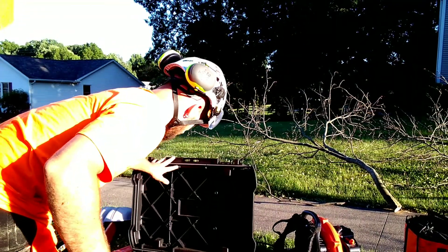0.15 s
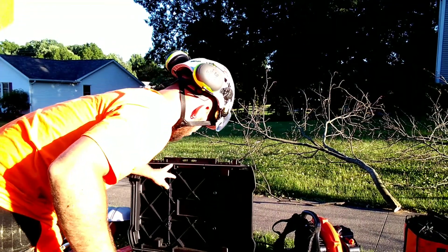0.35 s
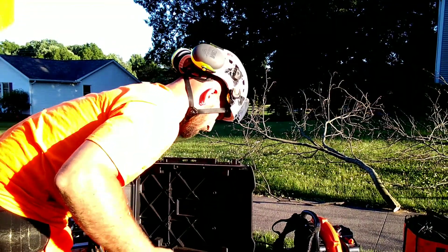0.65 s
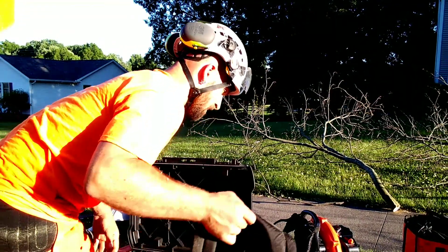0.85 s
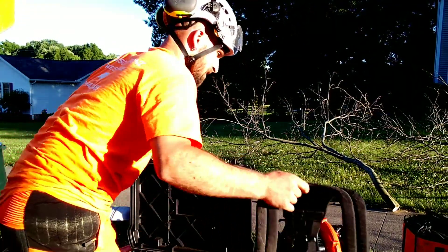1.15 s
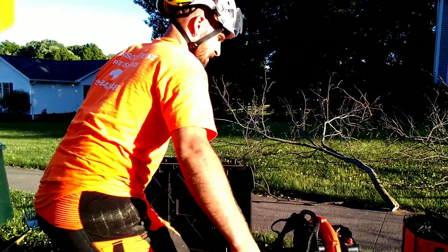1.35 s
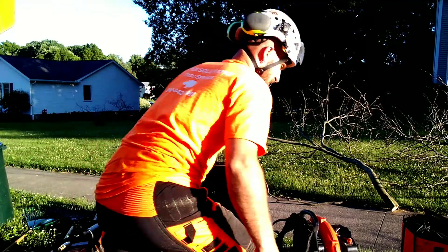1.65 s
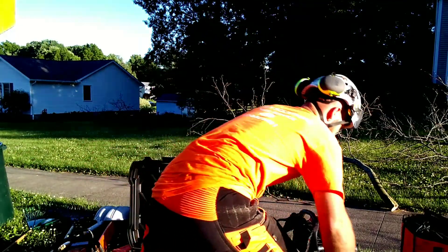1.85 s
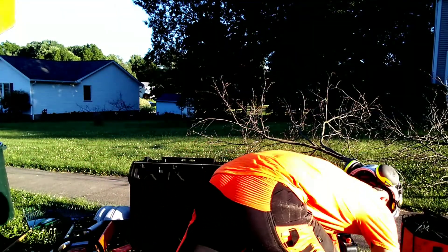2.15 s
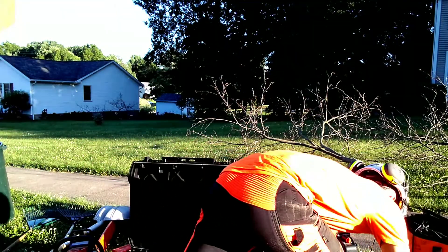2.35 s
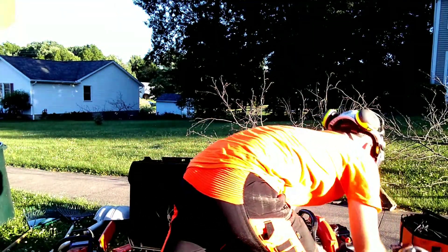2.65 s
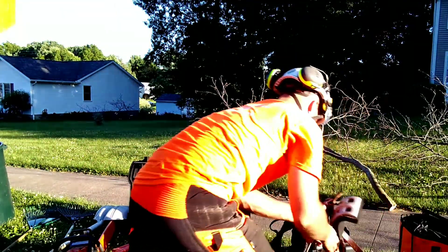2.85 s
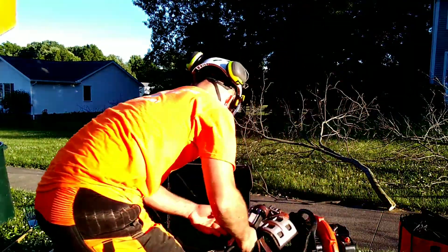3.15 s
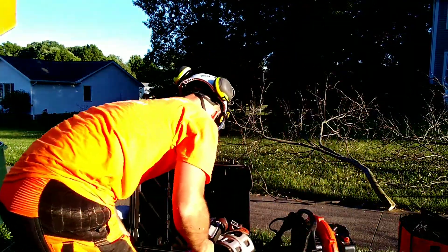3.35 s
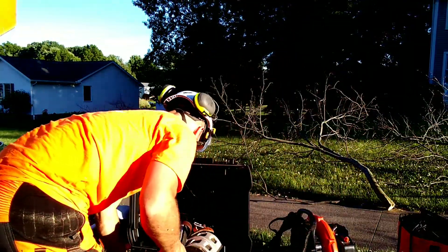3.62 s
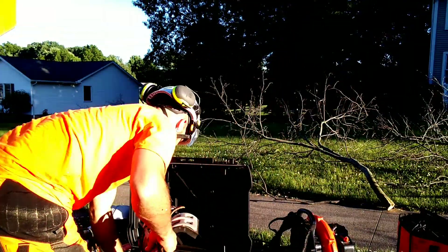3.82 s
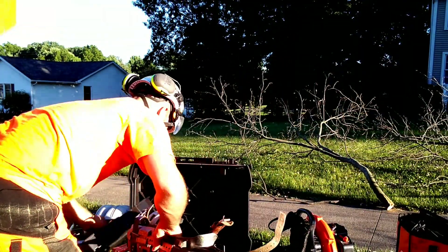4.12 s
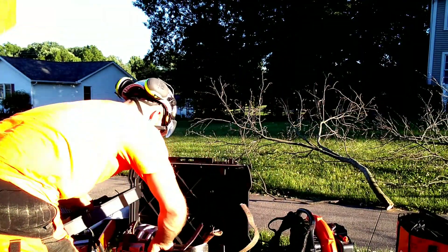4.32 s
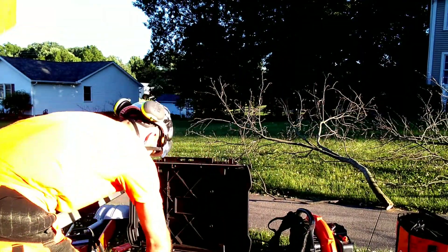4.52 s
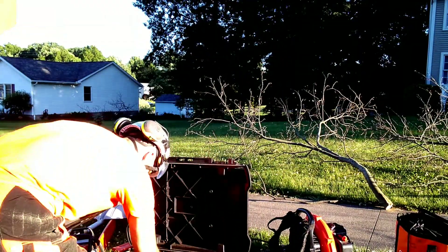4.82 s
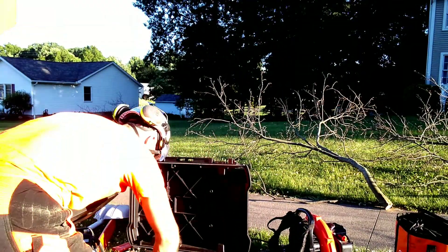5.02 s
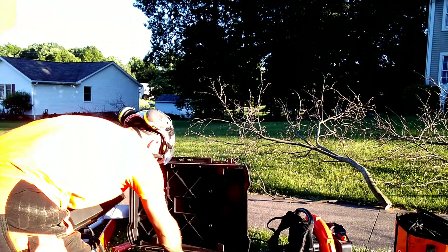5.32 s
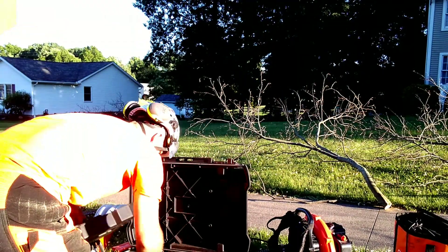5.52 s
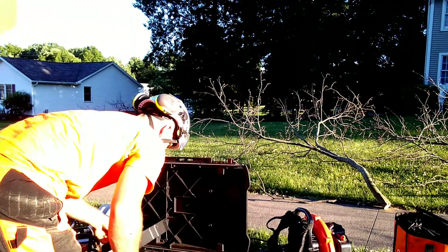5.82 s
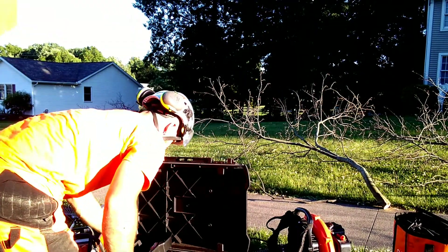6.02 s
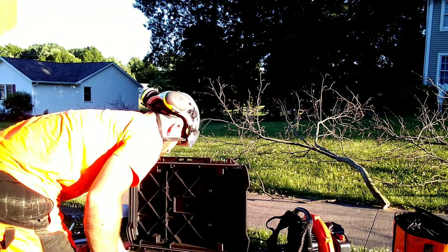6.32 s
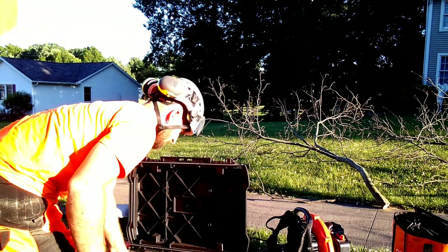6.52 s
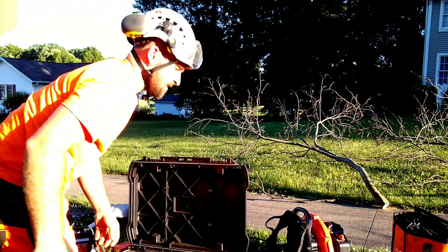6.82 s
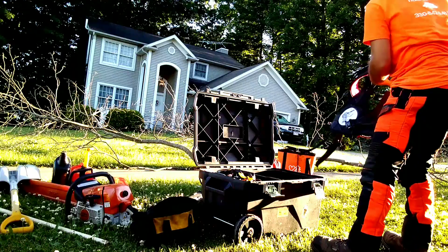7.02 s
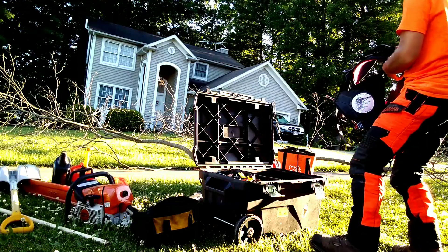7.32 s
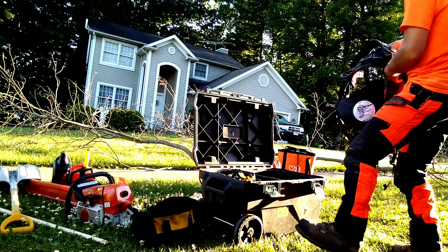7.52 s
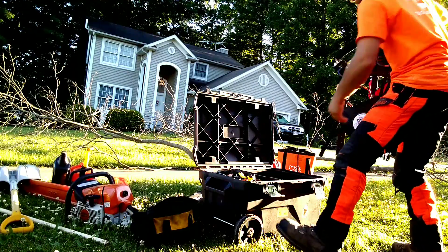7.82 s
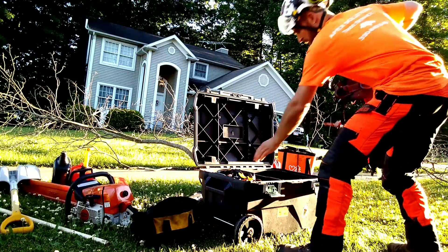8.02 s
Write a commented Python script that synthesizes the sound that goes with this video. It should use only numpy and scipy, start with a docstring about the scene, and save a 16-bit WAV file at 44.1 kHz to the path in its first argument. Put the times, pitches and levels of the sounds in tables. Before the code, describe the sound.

Climbing hardware is packed into a plastic toolbox outdoors, near the microphone. First comes a burst of clinking buckles and swishing straps, then sharp clacks as the gear is shifted. Three loads land in the box, making its walls boom while the pieces rattle and scrape. It ends with quiet rustling and low, soft steps, over a faint background of traffic, a far motor and birds.

```python
"""Climbing hardware goes into a plastic toolbox on a lawn, near a two-port camera microphone.
First webbing rustles and the gear is lifted: parts clack and metal pieces ring on their own modes.
It is jostled from 2.3 s, then dropped in near 4.7, 5.4 and 6.3 s, and the box walls boom.
From 7 s the gear is further off and footfalls shake the camera stand.
Throughout, traffic, a far motor, leaves and birds fill the pauses."""
import sys
import numpy as np
from scipy import signal
from scipy.fft import rfft, irfft
from scipy.io import wavfile
from scipy.ndimage import uniform_filter1d, map_coordinates

SR = 44100
rng = np.random.default_rng(int(sys.argv[2]) if len(sys.argv) > 2 else 0)


def materialize(psi):
    """Save the field psi as 16-bit PCM at rate SR to the path in sys.argv[1].

    A 1-D psi becomes a single channel; in a 2-D psi each row is a channel.
    """
    bounded = np.clip(np.atleast_2d(psi).T, -1, 1)
    quanta = np.round(bounded * 32767).astype(np.int16)
    wavfile.write(sys.argv[1], SR, quanta)


N = 359856

# hard contacts: t/s, tick level/dB, knock level/dB, knock f/Hz, slope below f/(dB/octave), tick t60/s
CONTACTS = [(0.134, -69, -42.5, 447, 2, 0.03), (0.176, -39, -41.5, 600, -2, 0.023),
            (0.2018, -43, -40, 440, 7, 0.065), (0.8487, -61, -50.5, 554, 13, 0.05),
            (0.9032, -67, -43, 560, -24, 0.013), (1.1209, -44, -49.5, 525, -7, 0.19),
            (1.1474, -38.5, -40.5, 2140, 28, 0.088), (1.4136, -18, -33.5, 575, 0, 0.023),
            (1.4526, -18, -22.5, 625, 8, 0.059), (1.4782, -11.5, -33, 397, 0, 0.06),
            (1.521, -27, -41.5, 401, 5, 0.18), (1.5544, -29, -35, 432, 3, 0.087),
            (1.5721, -20.5, -31, 384, 2, 0.044), (1.5898, -32, -66, 546, 4, 0.045),
            (1.6352, -26.5, -36, 875, 1, 0.022), (1.66, -29, -42, 401, 10, 0.015),
            (1.6806, -53, -34, 406, 5, 0.022), (1.8723, -47, -69, 2440, 9, 0.072),
            (2.283, -43.5, -71, 412, 2, 0.05), (2.3314, -55, -34, 830, 5, 0.034),
            (2.3808, -40, -38, 867, 2, 0.062), (2.4014, -16, -20, 1590, 9, 0.029),
            (2.4189, -26.5, -36.5, 1350, -0.5, 0.088), (2.4441, -16, -24, 1520, 7, 0.043),
            (2.4853, -27.5, -22, 2640, 3.5, 0.032), (2.5447, -35.5, -43, 1320, 0.5, 0.071),
            (2.6736, -35, -40, 1396, 6, 0.029), (2.7464, -44, -38.5, 2480, 6, 0.038),
            (2.7559, -60, -32.5, 2510, 3, 0.03), (2.7844, -45, -36.5, 2600, 8, 0.028),
            (2.9106, -43, -44.5, 1150, 14, 0.12), (2.9718, -2.5, -18.5, 2254, 1.5, 0.077),
            (3.1329, -5.5, -15.5, 2104, 3, 0.069), (3.175, -25.5, -30.5, 786, 12, 0.075),
            (3.217, -23, -44, 1200, 4, 0.036), (3.2257, -37, -26, 1223, 2, 0.045),
            (3.258, -10.5, -23.5, 1368, 2, 0.055), (3.3896, -61, -18, 1216, -5.5, 0.06),
            (3.4934, -47, -45, 544, 7, 0.041), (3.587, -50, -45, 450, 11, 0.06),
            (3.6242, -66, -38, 405, 13, 0.055), (3.6375, -45.5, -37, 394, -2, 0.12),
            (3.9011, -46, -34.5, 1040, -2.5, 0.11), (3.9578, -40.5, -41.5, 2690, 1, 0.078),
            (3.9937, -56, -41, 447, -4, 0.099), (4.112, -54, -45, 1020, 10.5, 0.06),
            (4.284, -71.5, -53, 700, 2.5, 0.041), (4.4319, -47, -37, 464, 8, 0.059),
            (4.5333, -40.5, -37.5, 400, -2, 0.09), (4.575, -49, -33.5, 530, -23, 0.042),
            (4.6427, -51, -34, 520, -6, 0.039), (4.6722, -46, -19.5, 455, 9, 0.044),
            (4.7335, -38, -8.5, 470, 0, 0.057), (4.7491, -14, -8, 536, 1, 0.043),
            (4.7978, -23.5, -23, 475, 11, 0.092), (4.8982, -27.5, -28, 400, 5, 0.048),
            (4.9423, -30.5, -36, 490, -2, 0.034), (4.9736, -38, -24.5, 2330, 6.5, 0.064),
            (5.0734, -38, -45, 1370, 9, 0.038), (5.0938, -52, -36, 1950, 4, 0.067),
            (5.1044, -36, -26.5, 1930, 20, 0.079), (5.1352, -25.5, -36, 462, 18, 0.062),
            (5.1786, -34, -36, 1230, 19, 0.025), (5.1988, -29, -21.5, 1850, 8.5, 0.029),
            (5.2294, -52, -32.5, 604, -10, 0.04), (5.2741, -40.5, -28, 526, 17, 0.042),
            (5.3206, -29, -27, 604, 38, 0.043), (5.3981, -13.5, -12.5, 962, 13, 0.18),
            (5.4175, -8.5, -11, 1224, 6, 0.073), (5.4312, -19.5, -10.5, 570, 1, 0.12),
            (5.468, -8, -24, 454, 20, 0.049), (5.5054, -24, -21, 1770, 14, 0.048),
            (5.542, -46, -24, 458, -2, 0.064), (5.555, -33.5, -32, 454, 9, 0.059),
            (5.5729, -48, -18, 1180, 24, 0.047), (5.581, -49, -33, 1480, 2, 0.063),
            (5.6156, -31, -44, 401, 7, 0.061), (5.6301, -21, -15, 1960, 16, 0.058),
            (5.6445, -9.5, -15.5, 512, 36, 0.038), (6.056, -69, -38, 1104, -6.5, 0.052),
            (6.2131, -41, -16, 530, -1.5, 0.044), (6.239, -42.5, -24, 988, 15, 0.062),
            (6.321, -42, -26, 950, 10, 0.028), (6.3408, -30.5, -16, 480, 7, 0.066),
            (6.391, -37, -15, 547, 18, 0.061), (6.398, -33, -16, 1600, 14, 0.036),
            (6.5963, -61, -43, 479, 7, 0.032), (7.157, -34.5, -46, 510, 21, 0.074),
            (7.399, -53, -50, 1440, 11, 0.045), (7.475, -57.5, -53, 1924, 7.5, 0.05),
            (7.637, -50, -70, 784, 5, 0.05), (7.924, -67.5, -51, 822, 7, 0.053)]
# spectrum common to all contacts: f/Hz, level/dB
CONTACT_SPECTRUM = [(300, 2), (520, 2), (900, -3), (1500, 4), (2500, -5), (4000, -4), (7000, -8.5),
                    (12000, -2.5), (16500, -7.5)]
# blows on the box: t/s, level/dB, f/Hz favoured by the struck spot, time scale of damping by the load/s
BOX_BLOWS = [(0.133, -41, 150, 0.066), (0.177, -28.5, 116, 0.031), (0.21, -33, 253, 0.054),
             (1.159, -45.5, 306, 0.043), (1.429, -35, 247, 0.047), (1.482, -31.5, 204, 0.075),
             (1.573, -30.5, 284, 0.056), (1.684, -26.5, 320, 0.061), (3.261, -39, 250, 0.045),
             (3.393, -24, 222, 0.074), (3.516, -37, 162, 0.073), (3.62, -26.5, 274, 0.11),
             (3.92, -47, 189, 0.04), (3.982, -39, 187, 0.053), (4.436, -36.5, 187, 0.062),
             (4.613, -28.5, 187, 0.4), (4.681, -28.5, 272, 0.04), (4.733, -9.5, 191, 0.089),
             (4.745, -6, 205, 0.089), (4.757, -18.5, 212, 0.083), (4.78, -21.5, 208, 0.051),
             (4.8, -16.5, 240, 0.04), (4.828, -27, 207, 0.13), (5.007, -31.5, 215, 0.066),
             (5.05, -37, 186, 0.069), (5.091, -43, 211, 0.081), (5.165, -37, 214, 0.13),
             (5.23, -28, 225, 0.12), (5.285, -27, 215, 0.061), (5.385, -24, 179, 0.1),
             (5.4, -11.5, 171, 0.099), (5.417, -15.5, 168, 0.2), (5.437, -17, 170, 0.061),
             (5.456, -22.5, 236, 0.022), (5.477, -37, 168, 0.053), (5.55, -29.5, 169, 0.075),
             (5.609, -30.5, 180, 0.081), (5.646, -29, 255, 0.036), (6.207, -18.5, 223, 0.027),
             (6.237, -24.5, 214, 0.07), (6.272, -30, 182, 0.028), (6.338, -10, 218, 0.048),
             (6.388, -17.5, 226, 0.055), (6.429, -27, 182, 0.035), (6.546, -37.5, 219, 0.033),
             (6.6, -42, 204, 0.122)]
# modes of the box and of five metal pieces: f/Hz, level/dB, t60/s
BOX_MODES = [(89, -1.5, .1), (118, -2.5, 0.14), (153.5, 4.5, 0.041), (187.3, 8, 0.082), (194.4, 7.5, 0.098),
             (244.4, -5, 0.077), (331, 0.5, 0.033), (459, -2.5, 0.05), (548, -7, 0.04)]
RING = [(5100, -9.5, 0.03), (7870, -7.5, 0.037), (13100, -8.5, 0.12), (13470, -6, 0.16)]
CARABINER = [(5520, -4.5, 0.11), (5760, -7, 0.07), (8260, -11, 0.067), (12700, -0.5, 0.1),
             (15130, -2.5, .08)]
BUCKLE = [(3810, -2, 0.024), (4120, -3.5, 0.023), (4990, -9, 0.035), (10400, -5.5, .03),
          (11200, -0.5, 0.05), (13300, -3.5, .03)]
SNAP_HOOK = [(9750, -8.5, 0.087), (12140, 3.5, 0.12), (14900, -1, 0.16)]
SHACKLE = [(4190, 0.5, 0.15), (7050, 0, 0.04), (8900, 4.5, 0.057), (13000, 4, 0.045)]
# blows on the metal pieces: t/s, level/dB, modes of the piece
METAL_BLOWS = [(1.413, -25, RING), (1.414, -12.5, BUCKLE), (1.428, -27.5, BUCKLE), (1.4544, -20.5, BUCKLE),
               (1.477, -23, CARABINER), (1.519, -35, BUCKLE), (1.589, -29, RING), (1.6387, -33, BUCKLE),
               (1.659, -22, RING), (1.5565, -28.5, BUCKLE), (1.589, -34, CARABINER), (1.872, -39.5, RING),
               (1.932, -53.5, RING), (3.5296, -50.5, CARABINER), (4.5757, -44.5, CARABINER),
               (4.6344, -51, CARABINER), (4.661, -50.5, CARABINER), (4.698, -43.5, CARABINER),
               (5.066, -52.5, SNAP_HOOK), (5.238, -52.5, CARABINER), (5.343, -55, CARABINER),
               (5.5779, -46.5, SNAP_HOOK), (5.6474, -20.5, BUCKLE), (3.085, -44, SNAP_HOOK),
               (7.158, -44, SHACKLE)]
# quiet, continuous handling: t/s, cloth level/dB, sheen level/dB, level of drag on the box/dB
HANDLING = [(0, -79, -89, -78), (.3, -78, -84, -73.5), (.7, -76.5, -83.5, -76), (.85, -69, -74.5, -80),
            (1.1, -71.5, -69, -72), (1.39, -64.5, -66, -69), (1.95, -69.5, -71.5, -72),
            (2.9, -68.5, -72, -70), (3.53, -66.5, -64, -57.5), (3.8, -71.5, -77, -65.5),
            (4.2, -77.5, -87.5, -72), (4.42, -68.5, -73.5, -65.5), (4.6, -65.5, -70.5, -45.5),
            (5.05, -62.5, -73.5, -49.5), (5.3, -59.5, -69.5, -47.5), (5.75, -72, -79.5, -72),
            (6.19, -72, -83, -67), (6.7, -81, -96.5, -77), (6.9, -70, -65.5, -76), (7.5, -69.5, -72.5, -66),
            (7.85, -75.5, -79.5, -72), (8.0, -69, -69.5, -72.5)]
# gear sliding over itself: t/s, duration/s, cloth level/dB, sheen level/dB, level of drag on the box/dB
SLIDES = [(0.178, 0.073, -65, -84, -50), (1.416, 0.063, -43.5, -45.5, -53),
          (1.461, 0.23, -56.5, -53.5, -57.5), (1.813, 0.044, -67.5, -62, -69), (2.355, 0.16, -49, -56, -61),
          (2.964, 0.35, -47, -51, -61), (3.326, 0.16, -58, -52.5, -54.5), (3.886, 0.2, -59, -80, -54.5),
          (4.76, 0.0076, -32, -30, -17.5), (4.783, 0.066, -41, -49, -49), (5.416, 0.04, -28.5, -28.5, -23),
          (5.46, 0.04, -40.5, -40, -33), (5.513, 0.18, -53.5, -65, -45), (6.238, 0.056, -47, -52.5, -38),
          (6.341, 0.082, -43.5, -52, -28.5), (6.464, 0.16, -68.5, -74.5, -57.5),
          (7.157, 0.072, -60.5, -55, -66), (7.255, 0.043, -57.5, -56, -55),
          (7.345, 0.14, -63.5, -72.5, -71)]
# friction spectra of webbing, the mid-range cloth and the high sheen: f/Hz, level/dB
CLOTH_SPECTRUM = [(300, -11), (600, -0.5), (1500, -4.5), (3000, -5), (4500, -8), (6000, -10.5),
                  (9000, -28.5)]
SHEEN_SPECTRUM = [(4000, -19), (7000, -8.5), (9500, -5.5), (12000, 0.5), (15500, -1)]
# direction of the gear: t/s, delay at the left port/samples, left minus right level/dB
GEAR_DIRECTION = [(0, -3.5, -0.5), (1.5, -3, 1.5), (2.1, 7.5, 1), (3.2, 4, 1), (3.6, -3, 2), (6.8, -4.5, 0),
                  (7, 10.5, 0.5)]
# footfalls: t/s, level/dB
STEPS = [(7.098, -43.5), (7.17, -44), (7.244, -32), (7.272, -31), (7.343, -42.5), (7.562, -44),
         (7.661, -42), (7.901, -46)]
# modes of the camera stand: f/Hz, level/dB, t60/s
STAND_MODES = [(56.8, -0.5, 0.33), (85.4, 2.5, 0.13), (156, -0.5, 0.058)]
# swell of distant traffic: t/s, level/dB
TRAFFIC_LEVEL = [(0.0, -63.5), (5.29, -50.5), (8.16, -64)]
# spectra of traffic and leaves: f/Hz, level/dB
TRAFFIC_SPECTRUM = [(15, -49.5), (25, -21.5), (64, -4.5), (97, -3), (151, -7.5), (177, -18.5), (313, -27.5),
                    (600, -44), (780, -73.5)]
LEAF_SPECTRUM = [(180, -26.5), (300, 1), (392, -23.5), (486, -16), (584, -24), (2000, -30), (4830, -23),
                 (6410, -41), (15000, -29.5), (16000, -37.5)]
# far motor: t/s, firing f/Hz, level/dB
MOTOR_RUN = [(1.3, 40.5, -72), (1.6, 42.42, -55), (2.0, 46.27, -61), (2.3, 49.3, -59.5), (3.3, 50.4, -55.5),
             (3.9, 49.44, -73.5), (4.3, 50.9, -81)]
# two calls of one bird: t/s, f/Hz, level/dB
BIRD_CALLS = [(.63, 2490, -100), (.66, 2200, -90), (.705, 2650, -84), (.78, 2410, -79), (.8, 2390, -100),
              (2.53, 2324, -100), (2.6, 2370, -64), (2.66, 2470, -87), (2.8, 2370, -65), (2.9, 2485, -100)]

CLACK_ATTACK_S, DECAY_POWER = 0.00088, 1.44  # power over 1: a contact rattles on, then stops short
SNAP_DB, SNAP_S = 3, .003  # the first touch stands out
BOUNCES_PER_S, BOUNCE_DB, BOUNCE_S = 400, -4.5, .0007  # then small rebounds crackle
TICK_FROM_HZ, KNOCK_TO_HZ = 1900, 8000
KNOCK_ABOVE_DB_OCT, KNOCK_LONGER = 7, 1.3
HOLLOW_DB, HOLLOW_T60_S = 1.5, 0.07  # pure tone in the knock
SWELL_DB_S, FADE_DB_S = 699.5, 500.5  # how fast a slide comes and goes
GRIT_PER_S, GRIT_DB = 180, -2.5
JINGLE_FROM_S, JINGLE_TO_S = 2.9, 5.7  # while the rack of carabiners is carried
JINGLE_LIMIT_DB = -55  # buried under heavier gear, the carabiners are driven no harder
CHIRPS_PER_S, CHIRP_HZ, CHIRP_S, CHIRP_DB = 16, 4100, .05, -83
LEAVES_DB, LEFT_TREBLE_DB, TOP_HZ = -76.5, -9.5, 15700


def clacks(size=6144):
    """Impact noise: each contact radiates a bright tick and a longer knock, both roughened by rebounds."""
    out, t = np.zeros((2, N)), np.arange(size) / SR
    band_hz = np.geomspace(300, 17000, num=70)
    colour_hz, colour_db = np.transpose(CONTACT_SPECTRUM)
    colour_db = np.interp(np.log(band_hz), np.log(colour_hz), colour_db)
    rise = 1 - np.exp(-t / CLACK_ATTACK_S)
    for s, tick_db, knock_db, pitch_hz, thin_db, t60 in CONTACTS:
        band_db = colour_db + 5 * rng.standard_normal(len(band_hz))
        bounces = crackle(BOUNCES_PER_S, decay_s=BOUNCE_S, size=size)
        chatter = 1 + undb(SNAP_DB) * np.exp(-t / SNAP_S) + undb(BOUNCE_DB) * bounces
        octaves = np.log2(band_hz / pitch_hz)
        skirt_db = np.where(octaves < 0, thin_db * octaves, -KNOCK_ABOVE_DB_OCT * octaves)
        tick = np.c_[band_hz, band_db][band_hz > TICK_FROM_HZ]
        knock = np.c_[band_hz, band_db + skirt_db][band_hz < KNOCK_TO_HZ]
        hollow = undb(HOLLOW_DB - 60 * t / HOLLOW_T60_S) * np.sin(2 * np.pi * pitch_hz * t)
        parts = (tick, 0, tick_db, 1, .55), (knock, hollow, knock_db, KNOCK_LONGER, pitch_hz / 6000)
        for spectrum, tone, db, longer, apart in parts:
            decay = undb(-60 * (t / (t60 * longer)) ** DECAY_POWER)
            burst = rise * decay * chatter * (port_noise(spectrum, apart, size) + tone)
            add(out, undb(db) * burst / np.abs(burst).max(), s)
    return out


def box_thuds(size=8192):
    """Modal response of walls: a soft blow favours modes near the spot's pitch; the load damps them."""
    out, t, impulse = np.zeros(N), np.arange(size) / SR, signal.unit_impulse(size)
    rise = 1 - np.exp(-t / 0.0029)
    for s, db, spot_hz, damping_s in BOX_BLOWS:
        modes = [(hz, mode_db - 11 * abs(np.log2(hz / spot_hz)), 3 * t60) for hz, mode_db, t60 in BOX_MODES]
        # neighbouring modes move in opposite directions
        walls = ringing(impulse, modes[::2]) - ringing(impulse, modes[1::2])
        thud = walls * rise * undb(-60 * t / (1.6 * damping_s))
        add(out, undb(db) * rng.choice([-1, 1]) * thud / np.abs(thud).max(), s)
    return out


def metal_clinks(size=8192):
    """Free vibration: a struck piece rings on its own modes; touching neighbours make it flutter."""
    out, impulse = np.zeros((2, N)), signal.unit_impulse(size)
    rise = 1 - np.exp(-np.arange(size) / SR / 0.00047)
    for s, db, piece in METAL_BLOWS:
        tune = 1 + .004 * rng.standard_normal()
        jitter = np.repeat(rng.standard_normal(size // 128), 128)
        flutter = undb(6 * uniform_filter1d(jitter, size=128))
        for port in out:  # each blow and port weights the modes anew
            modes = [(hz * tune, mode_db + 3 * rng.standard_normal(), t60) for hz, mode_db, t60 in piece]
            add(port, undb(db) * rng.choice([-1, 1]) * rise * flutter * ringing(impulse, modes), s)
    return out


def slide_gains():
    """Incoherent sources add in power: cloth, sheen and drag gains of slides that swell, hold and fade."""
    t, power = np.arange(N) / SR, 0
    for s, length, *db in SLIDES:
        shape_db = -SWELL_DB_S * np.maximum(s - t, 0) - FADE_DB_S * np.maximum(t - s - length, 0)
        power = power + np.outer(undb(db) ** 2, undb(shape_db) ** 2)
    return np.sqrt(power)


def webbing_rustle(quiet, sliding):
    """Friction noise: webbing swishes smoothly when handled and turns gritty when gear slides."""
    grit = unit(crackle(GRIT_PER_S, decay_s=0.0021, size=N))
    grain = undb(3 * walk(35)) * unit(1 + undb(GRIT_DB) * grit)
    cloth_gain, sheen_gain = np.hypot(undb(0.87 * walk(36)) * quiet, grain * sliding)
    cloth = cloth_gain * port_noise(CLOTH_SPECTRUM, apart=0.89)
    sheen = sheen_gain * port_noise(SHEEN_SPECTRUM, apart=0.56)
    return cloth + sheen


def box_drag(quiet, sliding):
    """Forced vibration: dragged gear keeps the box humming; a wall radiates motion, not a steady push."""
    gain = np.hypot(quiet, sliding) * undb(1.2 * walk(25))
    displacement = ringing(rng.standard_normal(N), BOX_MODES)
    return gain * unit(np.gradient(displacement))


def carabiner_jingle(sheen_gain, taps_per_s=60):
    """Random excitation: webbing taps carabiners together; each tap wakes one fluttering mode."""
    out, t = 0, np.arange(N) / SR
    push = np.minimum(sheen_gain, undb(JINGLE_LIMIT_DB)) * (t > JINGLE_FROM_S) * (t < JINGLE_TO_S)
    for mode in CARABINER:
        flutter = undb(5 * walk(300))
        taps = (rng.random(N) < taps_per_s / SR) * rng.standard_normal((2, N))
        out = out + flutter * ringing(taps * push, [mode])
    return out


def footfalls():
    """Structure-borne sound: steps excite the low modes of the stand and shake the right port most."""
    force = np.zeros(N)
    for s, db in STEPS:
        force[int(s * SR)] += undb(db)
    return ringing(force, STAND_MODES) * undb([[-10.5], [-3.5]])


def traffic():
    """Coherence of long waves: the distant rumble is nearly alike at both ports."""
    level_db = along(TRAFFIC_LEVEL)[0] + 1.3 * walk(4.9)
    return undb(level_db) * port_noise(TRAFFIC_SPECTRUM, apart=0.06)


def leaves():
    """Diffuse sound: the wide hiss of leaves is almost uncorrelated between the ports."""
    return undb(LEAVES_DB + 1.4 * walk(12)) * port_noise(LEAF_SPECTRUM, apart=0.94)


def motor():
    """Periodic excitation: a far motor is heard at the second and third harmonics of its firing rate."""
    firing_hz, db = along(MOTOR_RUN)
    phase = 2 * np.pi * np.cumsum(firing_hz) / SR
    second = undb(3.5 + 2.1 * walk(1.2)) * np.sin(2 * phase)
    third = undb(2.5 * walk(8.1)) * np.sin(3 * phase)
    return undb(db) * (second + third)


def bird():
    """Frequency modulation: one bird whistles a gliding pure tone that wavers in pitch and level."""
    hz, db = along(BIRD_CALLS)
    gain = undb(db + 4 * walk(40))
    wavering_hz = hz * (1 + .012 * walk(60))
    return gain * np.sin(2 * np.pi * np.cumsum(wavering_hz) / SR)


def far_chirps(size=4096):
    """Amplitude modulation: short whistles of far birds, at scattered pitches, flutter at each port."""
    out, t = np.zeros((2, N)), np.arange(size) / SR
    shape = np.sin(np.pi * np.clip(t / CHIRP_S, 0, 1))
    for when, pitch, glide in rng.random((int(CHIRPS_PER_S * N / SR), 3)):
        hz = CHIRP_HZ * (.8 + .4 * pitch) * (1 + 2 * (glide - .5) * t)
        add(out, shape * np.sin(2 * np.pi * np.cumsum(hz) / SR), when * N / SR)
    return undb(CHIRP_DB) * np.array([walk(150), walk(150)]) * out


def ringing(force, modes):
    """Modal superposition: a sum of damped resonators driven by one force."""
    out = 0
    for hz, db, t60 in modes:
        pole = np.exp(2j * np.pi * hz / SR - np.log(1000) / (t60 * SR))
        out = out + undb(db) * signal.lfilter([0, pole.imag], [1, -2 * pole.real, abs(pole) ** 2], force)
    return out


def port_noise(spectrum, apart, size=N):
    """Partial coherence: left and right coloured noise; `apart` is the share of power not in common."""
    hz, db = np.transpose(spectrum)
    bin_hz = np.arange(size // 2 + 1) * SR / size
    gain = undb(np.interp(np.log(bin_hz + 1), np.log(hz), db, -90, -90))
    noise = unit(irfft(rfft(rng.standard_normal((3, size))) * gain, size))
    return np.sqrt(1 - apart) * noise[0] + np.sqrt(apart) * noise[1:]


def crackle(per_s, decay_s, size):
    """Shot noise: randomly timed pulses, each decaying exponentially."""
    hits = (rng.random(size) < per_s / SR) * rng.exponential(size=size)
    return signal.lfilter([1], [1, -np.exp(-1 / (decay_s * SR))], hits)


def walk(rate_hz):
    """Smooth random fluctuation, rms 1."""
    k = int(SR / rate_hz)
    return unit(uniform_filter1d(np.repeat(rng.standard_normal(N // k + 1), k), k)[:N])


def along(table):
    """Linear interpolation of each column over time, one value a sample."""
    s, *columns = np.transpose(table)
    return [np.interp(np.arange(N) / SR, s, c) for c in columns]


def add(out, x, s):
    """Superposition of x on out from time s."""
    i = int(s * SR)
    out[..., i:i + x.shape[-1]] += x[..., :N - i]


def undb(db):
    return 10 ** (np.asarray(db) / 20)


def unit(x):
    return x / np.sqrt(np.mean(x ** 2))


def scene():
    """Differences of level and arrival time between the ports place the gear against the background."""
    metal = metal_clinks()
    quiet, sliding = undb(along(HANDLING)), slide_gains()  # rows: cloth, sheen, drag
    rustle = webbing_rustle(quiet[:2], sliding[:2])
    drag = box_drag(quiet[2], sliding[2])
    jingle = carabiner_jingle(sliding[1])
    delay, pan_db = along(GEAR_DIRECTION)
    shading = undb(np.array([pan_db, -pan_db]) / 2)  # the camera body shades only the short waves
    left, right = shading * (metal + clacks() + rustle + jingle) + box_thuds() + drag
    treble = signal.sosfilt(signal.butter(2, 6000, "high", fs=SR, output="sos"), left)
    left = left + undb(LEFT_TREBLE_DB) * treble  # extra treble at the open port
    left = map_coordinates(left, [np.arange(N) - delay], order=3)
    return np.array([left, right]) + footfalls() + traffic() + leaves() + motor() + bird() + far_chirps()


def record(dry):
    """Band limiting: the camera drops the deepest bass and cuts the top."""
    dry = signal.sosfilt(signal.butter(2, 42, "high", fs=SR, output="sos"), dry)
    return signal.sosfilt(signal.ellip(8, .2, 80, TOP_HZ, fs=SR, output="sos"), dry)


dry = scene()
out = record(dry)
materialize(out)
```